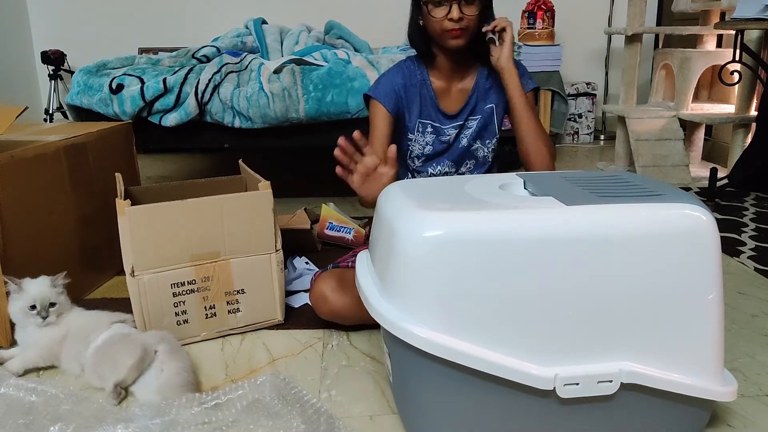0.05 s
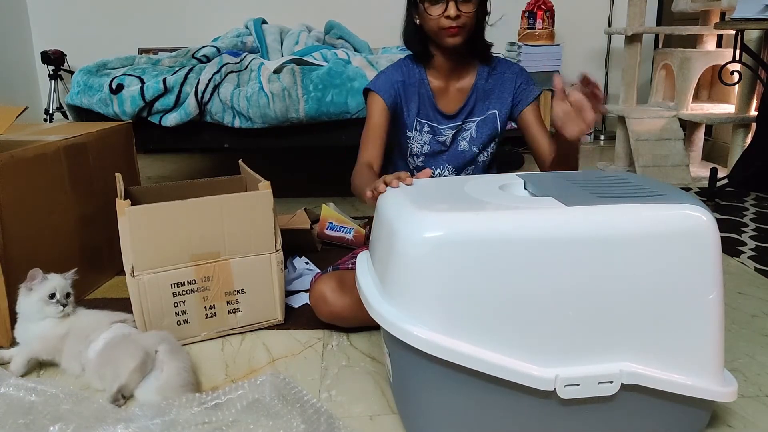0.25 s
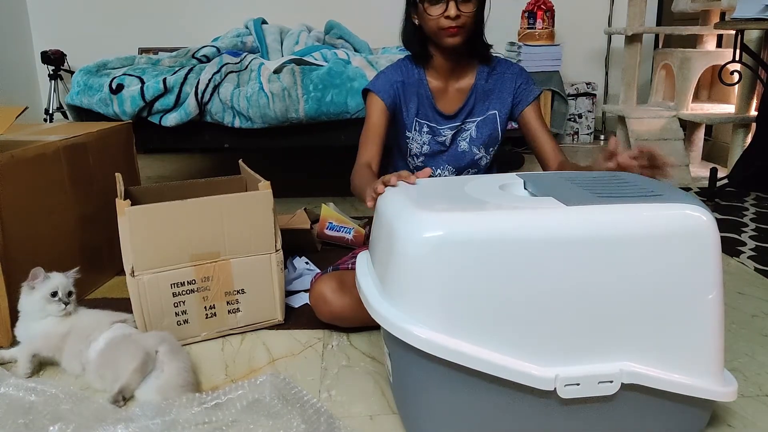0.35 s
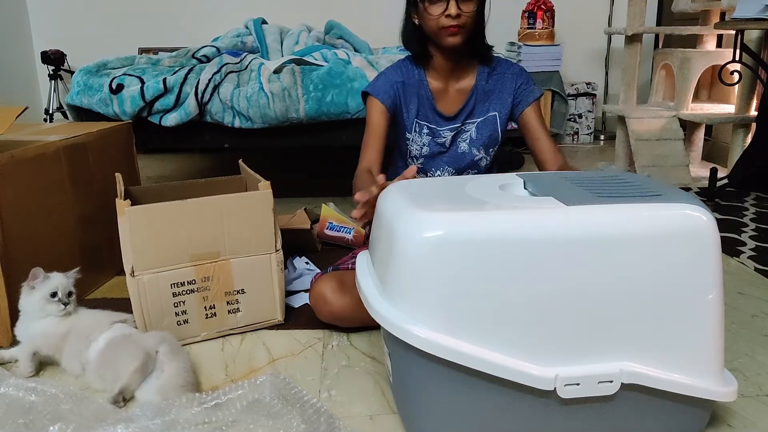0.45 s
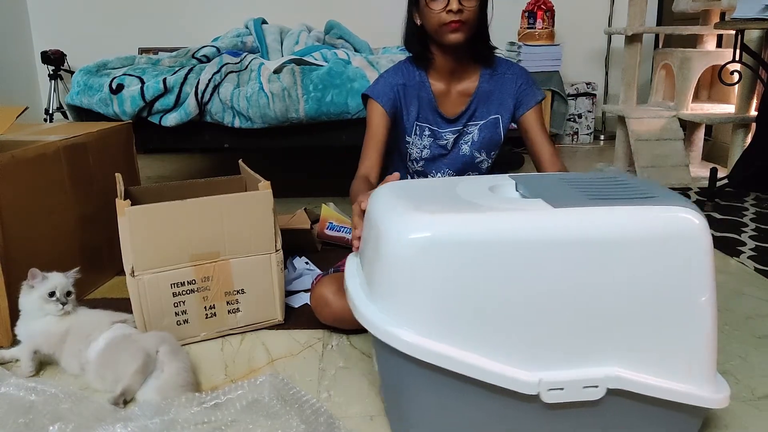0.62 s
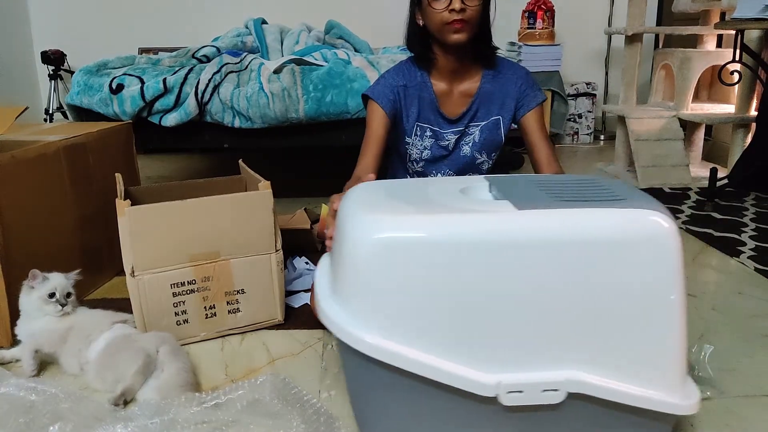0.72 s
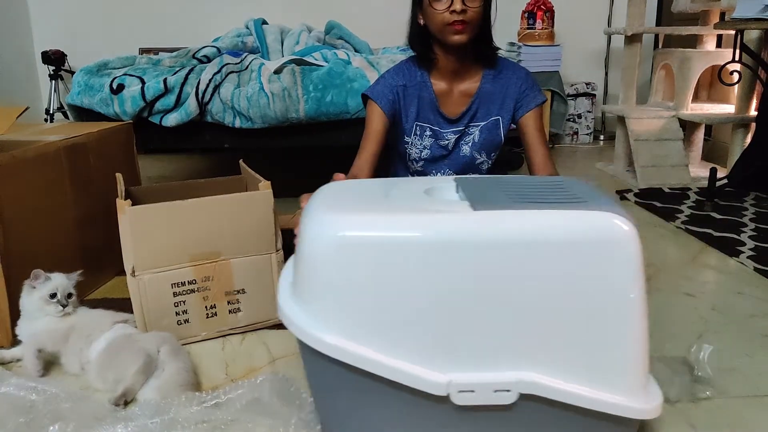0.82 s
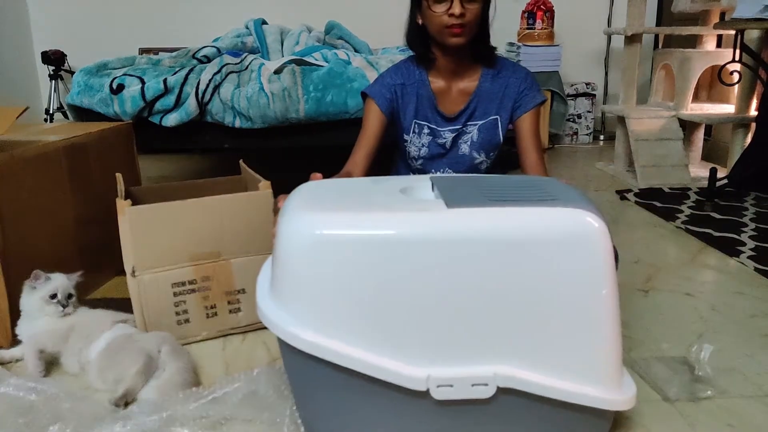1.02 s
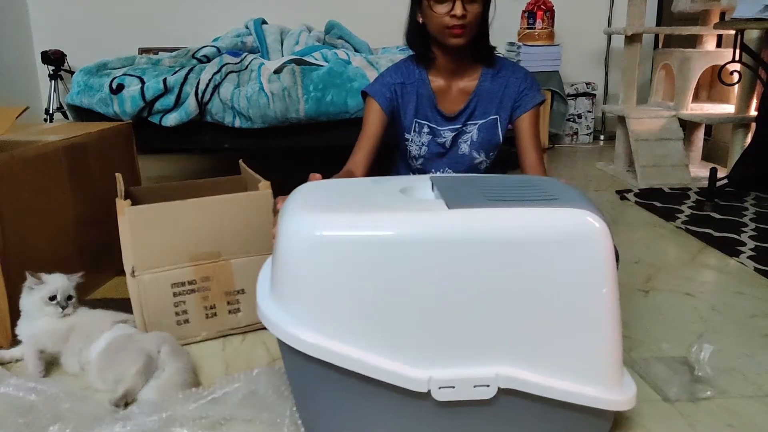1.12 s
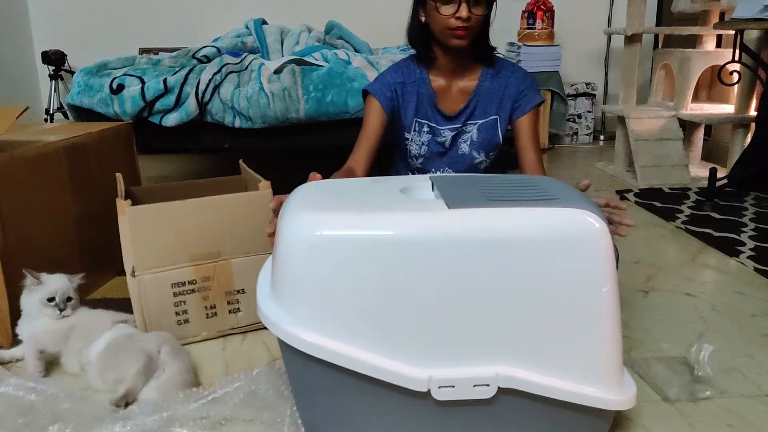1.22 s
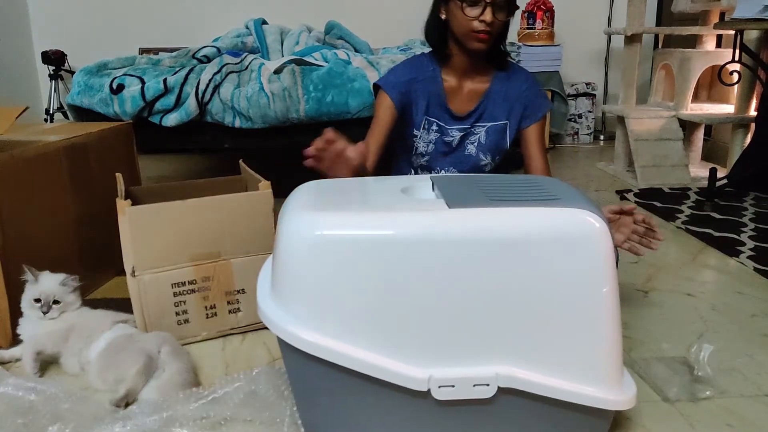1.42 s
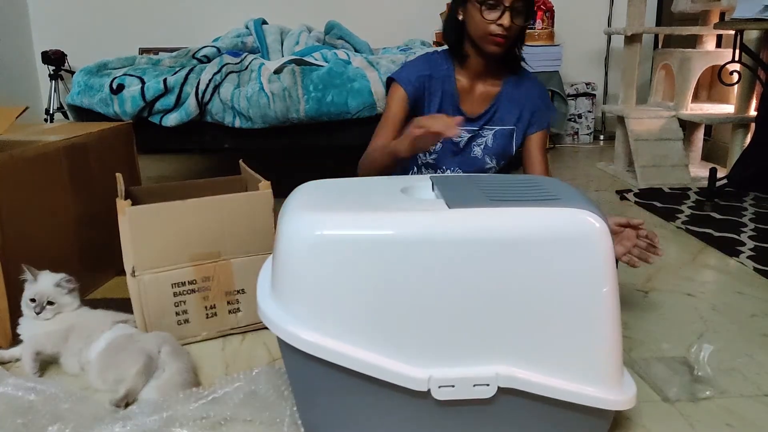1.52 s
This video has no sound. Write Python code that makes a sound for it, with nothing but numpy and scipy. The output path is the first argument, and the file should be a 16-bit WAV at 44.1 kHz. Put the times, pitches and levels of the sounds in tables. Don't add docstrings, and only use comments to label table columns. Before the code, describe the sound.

Hands land on a hard plastic hood, making drum-like low knocks; a second cluster of knocks leads into a gritty slide on tile, then soft bumps and quiet room hiss, heard in stereo in a small live room.

```python
import sys
import numpy as np
from scipy import signal
from scipy.fft import rfft, irfft
from scipy.io import wavfile
from scipy.ndimage import uniform_filter1d

SR = 44100
rng = np.random.default_rng(int(sys.argv[2]) if len(sys.argv) > 2 else 0)


def int16_out(signal):
    q = np.round(np.clip(np.atleast_2d(signal).T, -1, 1) * 32767)
    wavfile.write(sys.argv[1], SR, q.astype(np.int16))


def gain_from_decibels(decibels):
    exponent = np.asarray(decibels, float) / 20
    return 10 ** exponent


N = 68355

# frequency in Hz, level in dB, decay time t60 in s.
DEEP_MODES = [(85.7, -4, 0.33), (104.9, -6, 0.54), (146.8, -8, 0.36), (197.7, -0.5, 0.34),
              (213.4, 1.5, 0.16)]
# frequency in Hz, level in dB, decay time t60 in s.
WALL_MODES = [(241.3, -4, 0.26), (336.7, -9.5, 0.16), (365, -6, 0.094), (428, -11.5, 0.16),
              (503, -7, 0.098), (552, -5.5, 0.058), (619, -6.5, 0.064), (705, -18, 0.015), (830, -1, 0.029),
              (953, -19.5, 0.11), (1130, -33, 0.059), (1270, -25, 0.025)]


def evened(x):
    return x / np.sqrt(np.mean(x ** 2) + 1e-20)


def read(points, hz):
    f, value = np.transpose(points)
    return np.interp(np.log(hz + 1), np.log(f + 1), value)


def add(mix, s, sound):
    part = mix[..., round(s * SR):][..., :sound.shape[-1]]
    part += sound[..., :part.shape[-1]]


def colour(x, points):
    hz = np.fft.rfftfreq(x.shape[-1], 1 / SR)
    return irfft(rfft(x) * gain_from_decibels(read(points, hz)), x.shape[-1])


def pair(a, b):
    # frequency in Hz, left-right likeness as a correlation.
    likeness = [(60, 0.99), (180, 0.82), (550, 0.48), (1650, -0.37), (4970, -0.88), (15000, -0.47)]
    same = np.clip(read(likeness, np.fft.rfftfreq(N, 1 / SR)), 0, 1)
    right = same * rfft(a) + np.sqrt(1 - same ** 2) * rfft(b)
    return np.array([a, irfft(right, N)])


def ring(modes, t, places=0):
    out = 0
    for (hz, db, t60), place in zip(modes, places + np.zeros(len(modes))):
        out = out + gain_from_decibels(db + place - 60 * t / t60) * np.sin(2 * np.pi * hz * t)
    return out


def patchy(x):
    fleck_db = 1.5
    z = signal.stft(x, nperseg=256)[2]
    field = uniform_filter1d(rng.standard_normal(z.shape[1:]), size=3, axis=0)
    field = uniform_filter1d(field, size=5, axis=1)
    return evened(signal.istft(z * gain_from_decibels(fleck_db * evened(field)), nperseg=256)[1][:, :N])


def air():
    # frequency in Hz, hiss level in dB.
    air_colour = [(50, -5), (80, 0.5), (120, -7.5), (190, -9), (450, -23), (1200, -27), (2400, -26.5),
                  (16000, -50.5)]
    air_db = -52
    hum_hz, hum_db, hum_sway_db, hum_load_db = 38.3, -50, 3.5, 8.5
    t = np.arange(N) / SR
    a, b = evened(colour(rng.standard_normal((2, N)), air_colour)) * gain_from_decibels(air_db)

    def wander():
        rates_hz = (0.95, 2.4, 3.46, 1.96, 6.4)
        return evened(sum(np.sin(2 * np.pi * (f * t + rng.random())) for f in rates_hz))

    sway, drift = wander(), wander()
    load = np.exp(-((t - .85) / 0.59) ** 2)
    sides = np.array([[.8], [-.8]])
    level = gain_from_decibels(hum_db + hum_sway_db * sway + sides * drift + hum_load_db * load)
    drone = np.sin(2 * np.pi * np.cumsum(hum_hz + 0.35 * drift) / SR)
    return pair(a, b) + level * drone


def room(x):
    # frequency in Hz, reverberation time t60 in s.
    reverb_time = [(100, 0.47), (500, 0.46), (3000, 0.64), (12000, 0.37)]
    taps = np.zeros((2, SR))
    slots = np.arange(200, SR - 20, 20)
    at = slots + rng.integers(0, 20, (2, len(slots)))
    np.put_along_axis(taps, at, rng.choice([-1., 1.], at.shape), 1)
    hz, t, z = signal.stft(taps, SR, nperseg=256)
    decay = gain_from_decibels(-60 * t / read(reverb_time, hz)[:, None])
    tail = signal.istft(z * decay, SR, nperseg=256)[1][:, :SR]
    tail = pair(*np.pad(tail, ((0, 0), (0, N - SR))))
    return signal.fftconvolve(x, tail / np.linalg.norm(tail[0]), axes=1)[:, :N]


def whine():
    # time in s, level in dB, pitch in Hz.
    whine_path = [
        (.7, -54, 5600),
        (.745, -45, 5500),
        (.76, -45, 4100),
        (.78, -44, 4800),
        (0.796, -36.5, 5564),
        (.815, -50, 5470),
        (.84, -46, 5800),
        (.865, -40, 5060),
        (0.889, -48, 6000),
        (.93, -72, 5300),
    ]
    width_hz = 250
    t, (s, db, hz) = np.arange(N) / SR, np.transpose(whine_path)
    r = np.exp(-np.pi * width_hz / SR)
    noise = rng.standard_normal((2, N)) + 1j * rng.standard_normal((2, N))
    slow = signal.lfilter([1], [1, -2 * r, r * r], noise)
    carrier = np.exp(2j * np.pi * np.cumsum(np.interp(t, s, hz)) / SR)
    on = (t > s[0]) & (t < s[-1])
    return evened((slow * carrier).real) * gain_from_decibels(np.interp(t, s, db)) * on


def squeaks():
    # start in seconds, length in seconds, pitch in Hz, level in dB, tilt in dB per overtone.
    rim_squeaks = [
        (.862, .014, 690, -43, -4.),
        (.958, .017, 452, -34.5, -2.),
        (.977, .015, 485, -39, -9.),
    ]
    rise = .06
    out = np.zeros(N)
    for s, length, hz, db, tilt_db in rim_squeaks:
        t = np.arange(0, length, 1 / SR)
        turns = np.cumsum(hz * (1 + rise * t / length)) / SR
        stack = sum(gain_from_decibels(tilt_db * k) * np.sin(2 * np.pi * k * turns) for k in range(1, 8))
        add(out, s, gain_from_decibels(db) * np.sin(np.pi * t / length) ** .5 * evened(stack))
    return out


def slide():
    # time in s, hiss level in dB, rumble level in dB.
    slide_path = [
        (0.439, -66.5, -74),
        (0.517, -59, -36.5),
        (0.531, -52, -31),
        (0.604, -44.5, -34.5),
        (0.756, -34.5, -62.5),
        (0.867, -34, -48.5),
        (1.032, -44.5, -39),
        (1.118, -57.5, -40.5),
        (1.32, -66, -55.5),
    ]
    # frequency in Hz, level of the grit hiss in dB.
    grit_colour = [(180, 3), (300, -4), (366, -4.5), (3580, -4), (5700, -5.5), (8090, -10.5), (9710, -11.5),
                   (16000, -27)]
    grains_per_s, grain_spread_db, slips_per_s, slip_damping = 5000, 2.5, 900, .6
    t, (s, hiss_db, rumble_db) = np.arange(N) / SR, np.transpose(slide_path)
    on = (t > s[0]) & (t < s[-1])

    grains = rng.choice([-1., 1.], (2, N)) * gain_from_decibels(grain_spread_db * rng.exponential(1, (2, N)))
    grains = grains * (rng.random((2, N)) < grains_per_s / SR)
    scrape = evened(grains) + 2.17 * rng.standard_normal((2, N))
    grit = patchy(colour(scrape, grit_colour)) * gain_from_decibels(np.interp(t, s, hiss_db)) * on

    slips = rng.standard_normal(N) * (rng.random(N) < slips_per_s / SR)
    slips = evened(slips) * gain_from_decibels(np.interp(t, s, rumble_db)) * on
    u = t[:SR // 4]
    body = ring([(f, d, 0.98 * r) for f, d, r in DEEP_MODES], u)
    body = body + gain_from_decibels(-1) * ring([(f, d, slip_damping * r) for f, d, r in WALL_MODES[:-3]], u)
    shake = signal.fftconvolve(slips, body / np.linalg.norm(body))[:N]
    return pair(*grit), shake


def ticks():
    # time in s, peak in dB, pitch in Hz, puff in dB, puff t60 in s.
    contact_ticks = [(0.1073, -52.5, 9300, -74, 0.22), (0.11, -39, 4500, -58, 0.37),
                     (0.522, -37, 5300, -66, 0.022), (.5293, -47, 3900, -62, .02),
                     (.5605, -46, 6000, -78, .02), (0.2275, -32, 1750, -32.5, 0.3),
                     (.2288, -40, 13900, -80, 0.022), (.5243, -65, 14100, -47, 0.056),
                     (0.53, -36, 8500, -40, 0.31), (.541, -50, 13000, -44, 0.19),
                     (0.53, -34.5, 9700, -46, .03), (.5608, -52, 14000, -42.5, 0.061),
                     (1.425, -73, 9000, -64, 0.44),
                     (.2155, -43, 5150, -56, .022), (.2192, -27, 4900, -60, .009),
                  (.2218, -38, 6100, -70, .02), (.2233, -19, 6400, -52, .02), (.2236, -27, 3900, -70, .02),
                  (.2238, -23, 6300, -70, .02), (.2238, -40, 9800, -70, .02), (.2247, -32, 5600, -70, .02),
                  (.2263, -33, 6300, -70, .02), (.2357, -27, 4400, -70, .02), (.2322, -42, 13500, -70, .02),
                  (.238, -44, 14000, -70, .02)]
    # frequency in Hz, level of the puff in dB.
    puff_colour = [(180, -14.5), (300, -17), (574, -13.5), (1120, -19.5), (1210, -18), (9550, -33),
                   (16000, -50.5)]
    click_s = .00018
    out, t = np.zeros((2, N)), np.arange(SR // 2) / SR
    hiss = evened(colour(rng.standard_normal((2, N)), puff_colour))
    for s, db, hz, puff_db, t60 in contact_ticks:
        click = gain_from_decibels(db) * np.exp(-(t / click_s - 2) ** 2) * np.sin(2 * np.pi * hz * t)
        add(out, s, click * np.ones((2, 1)))
        first = round(s * SR)
        decay = gain_from_decibels(puff_db - 60 * t / t60)[:N - first]
        add(out, s, decay * hiss[:, first:][:, :len(t)])
    return out


def rocking():
    # start in seconds, peak in dB, pitch in Hz, length in seconds.
    rock_knocks = [(.5638, -10, 192, 0.02), (.583, -27, 190, .014), (.742, -28, 203.6, .025),
                   (.768, -34.5, 200, .025), (.455, -38.5, 100, .03), (.4255, -33, 84, 0.027),
                   (.629, -25, 169, 0.011), (.2815, -31, 164, .02), (.352, -27.5, 209.4, 0.028),
                   (.386, -45, 168, 0.016), (.418, -29, 186, 0.0204), (.642, -27.5, 210, 0.029),
                   (.665, -23, 197, 0.015), (1.005, -39.5, 190, 0.028), (1.03, -38, 169, 0.023),
                   (1.065, -39, 129, 0.02), (1.09, -31, 109, 0.02), (1.1217, -26, 182, .016),
                   (1.139, -32, 181, 0.011), (1.167, -29, 139, 0.023), (1.232, -35, 75, .025),
                   (1.31, -42, 89, 0.046)]
    # start in seconds, pitch in Hz, level in dB, decay time t60 in s.
    lone_walls = [(.2285, 454, -26.5, 0.15), (.238, 344, -37, 0.16), (.243, 573.5, -34.5, 0.18),
                  (.27, 340, -37, 0.089), (.272, 449.9, -38, 0.067), (.293, 626, -37.5, 0.18),
                  (.295, 377, -35.5, 0.11), (.335, 320, -47, 0.13), (.528, 335.6, -34, 0.18),
                  (.535, 547.4, -30, 0.13), (.558, 692, -34.5, .1), (.59, 358, -31.5, .12),
                  (.655, 550, -42, 0.096), (.995, 553, -48, 0.33), (1.118, 558, -60, 0.23),
                  (.765, 329, -47, 0.21), (.86, 326, -43.5, 0.21), (.628, 1597, -42, 0.2),
                  (.575, 1274, -46, 0.13), (1.19, 616, -53, 0.15)]
    knock_skew, wall_rise_s = .42, 0.0031
    out, t = np.zeros(N), np.arange(SR // 2) / SR
    for s, db, hz, length in rock_knocks:
        swell = np.sin(np.pi * np.minimum(t / length, 1) ** knock_skew)
        add(out, s, -gain_from_decibels(db) * swell * np.sin(2 * np.pi * hz * t))
    for s, hz, db, t60 in lone_walls:
        add(out, s, (1 - np.exp(-t / wall_rise_s)) * ring([(hz, db, t60)], t))
    return out


def bumps():
    # start in seconds, peak in dB, boom pitch in Hz, long ring in dB, upper modes in dB.
    hood_bumps = [(0.2294, -11, 191.8, -11.5, -11.5), (0.2537, -22.5, 156, -9, -5),
                  (0.2745, -21, 166, -2.5, -16), (0.2956, -19.5, 179.3, -25, -16),
                  (0.3154, -19.5, 187.4, -33, -23), (0.3398, -24.5, 204.4, -38, -21),
                  (0.412, -43, 191, -11.5, -30), (0.5096, -31, 160.9, -6, -12),
                  (0.535, -23.5, 170, -30, -10), (0.5577, -23.5, 194.4, -1, -13),
                  (0.5757, -37, 218, -8, -16), (0.6011, -22, 148, -25, -28),
                  (0.6257, -21.5, 189.5, -23, -26), (0.6442, -33, 167, -16, -4.5),
                  (0.661, -42, 198.7, -13, -26), (0.693, -25, 202.3, -5, -21),
                  (0.7093, -32.5, 189, -9, -17), (0.744, -25.5, 206.6, -13.5, -24),
                  (0.8316, -29, 185, -17, -36), (0.8544, -30, 180, -32, -20), (0.9272, -34, 176, -22, -39),
                  (1.1154, -40, 159, -8, -11), (1.1494, -33.5, 177, -27, -14),
                  (1.1982, -35.5, 167, -37, -21)]
    # start in seconds, level in dB, pitch in Hz.
    finger_press = (.2215, -26, 185)
    boom_s, skew, contact_s = .024, .75, 0.00067
    detune, place_db = 0.0456, 2.5
    out, t = np.zeros(N), np.arange(SR // 2) / SR
    touch = np.hanning(round(2 * contact_s * SR) + 3)
    touch = touch / touch.sum()
    swell = np.sin(np.pi * np.minimum(t / boom_s, 1) ** skew)
    deep = (1 - np.exp(-t / 0.026)) * ring(DEEP_MODES, t)
    spots = rng.standard_normal((len(hood_bumps), 2, len(WALL_MODES)))
    for (s, db, hz, low_db, high_db), (place, bend) in zip(hood_bumps, spots):
        walls = [(f * (1 + detune * b), d, r) for (f, d, r), b in zip(WALL_MODES, bend)]
        struck = np.convolve(ring(walls, t, place_db * place), touch)[:len(t)]
        add(out, s + 0.002017, gain_from_decibels(db + high_db) * struck)
        boom = -swell * np.sin(2 * np.pi * hz * t)
        add(out, s, gain_from_decibels(db) * (boom + gain_from_decibels(low_db) * deep))
    s, db, hz = finger_press
    add(out, s, gain_from_decibels(db) * np.sin(np.pi * np.minimum(t / 0.0098, 1)) * np.sin(2 * np.pi * hz * t))
    return out


def scene():
    # frequency in Hz, gain in dB.
    boom_cut = [(30, -30), (62, -20), (82, 0), (16000, 0)]
    # frequency in Hz, gain in dB.
    hood_wet = [(60, -2), (150, -4), (200, -1), (330, -1.5), (1000, 6)]
    wet_db, wet_low_db = -7.5, -8
    grit, shake = slide()
    hood = colour(bumps() + rocking() + shake, boom_cut) + squeaks()
    hood = hood * np.ones((2, 1))
    bright = ticks() + grit
    wet = room(gain_from_decibels(wet_low_db) * colour(hood, hood_wet) + gain_from_decibels(wet_db) * bright)
    return hood + bright + wet + air() + whine()


def roll_off(x):
    return signal.sosfilt(signal.butter(12, 16520, fs=SR, output="sos"), x)


def record(dry):
    # frequency in Hz, width in Hz, level in dB.
    port_modes = [
        [(5780, 900, 3.5), (5200, 990, -47)],
        [(9525, 900, 11), (5100, 500, -32)],
    ]
    # frequency in Hz, gain in dB.
    port_tilts = [
        [(20, -2.8), (7000, -2), (9500, -6), (16000, 5)],
        [(20, -1.8), (7000, -2), (9500, -0.5), (16000, 8)],
    ]
    left_lag_s, edge_hz, low_cut_hz = .0001, 15950, 28
    hz, out = np.fft.rfftfreq(N, 1 / SR), []
    for x, port, tilt, lag in zip(dry, port_modes, port_tilts, (left_lag_s, 0)):
        band = (hz < edge_hz) / (1 + (low_cut_hz / (hz + 1)) ** 6)
        cavity = 1 + sum(gain_from_decibels(db) / (1 + 2j * (hz - f) / w) for f, w, db in port)
        delay = np.exp(-2j * np.pi * hz * lag)
        out.append(irfft(rfft(x) * gain_from_decibels(read(tilt, hz)) * band * cavity * delay, N))
    return roll_off(np.array(out))


dry = scene()
out = record(dry)
int16_out(out)
```